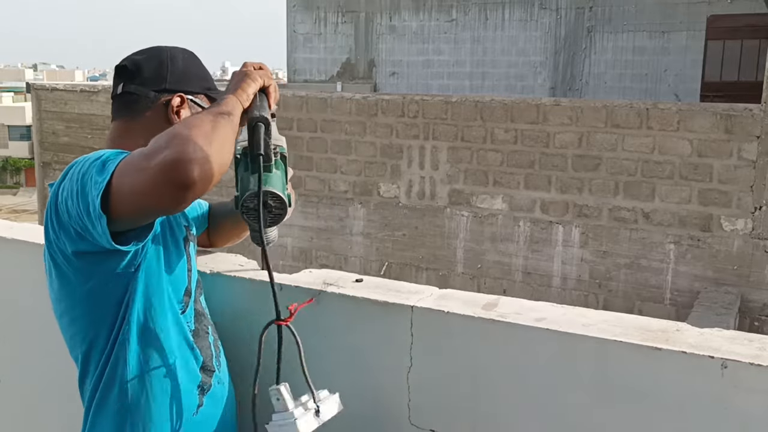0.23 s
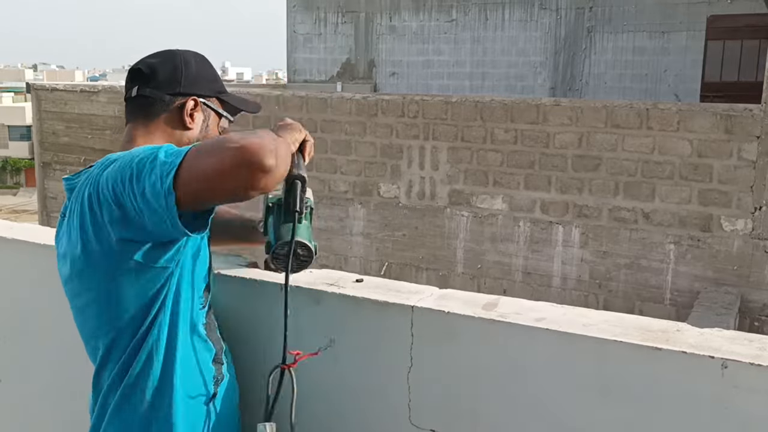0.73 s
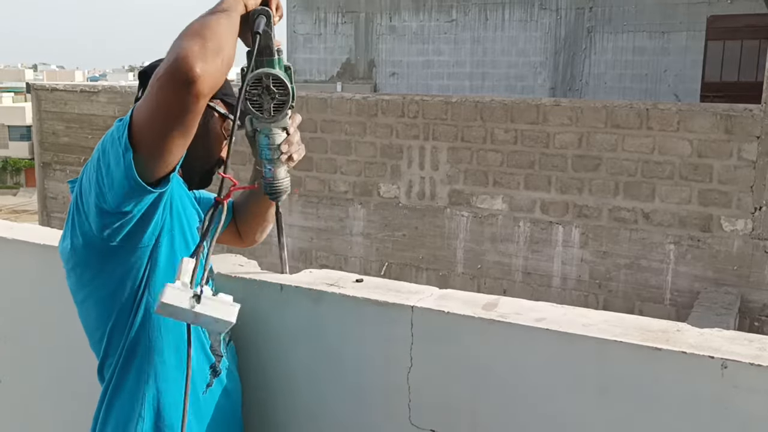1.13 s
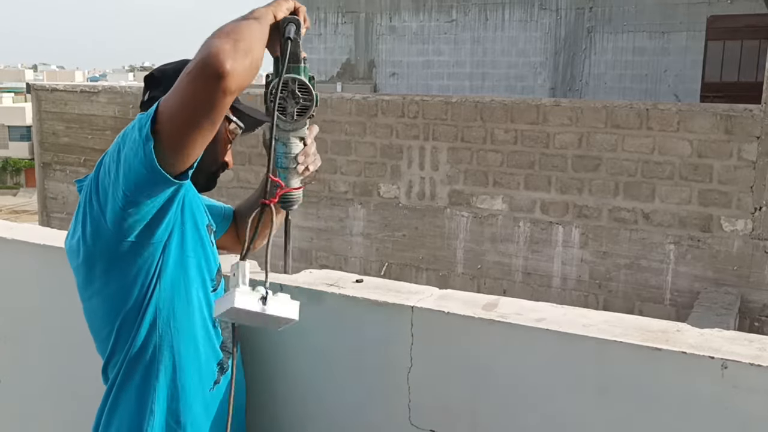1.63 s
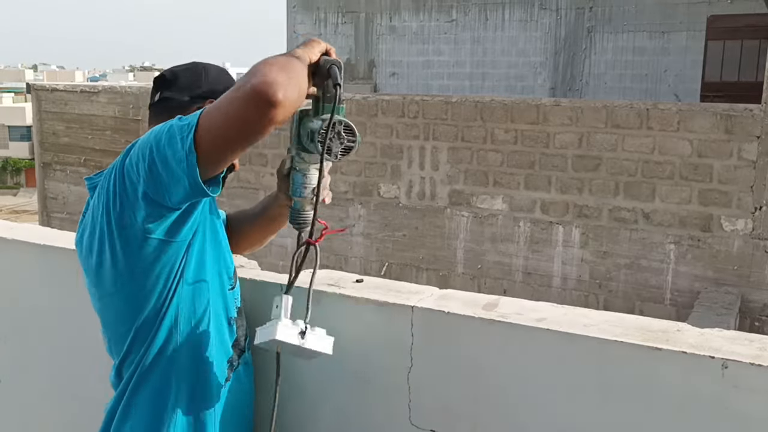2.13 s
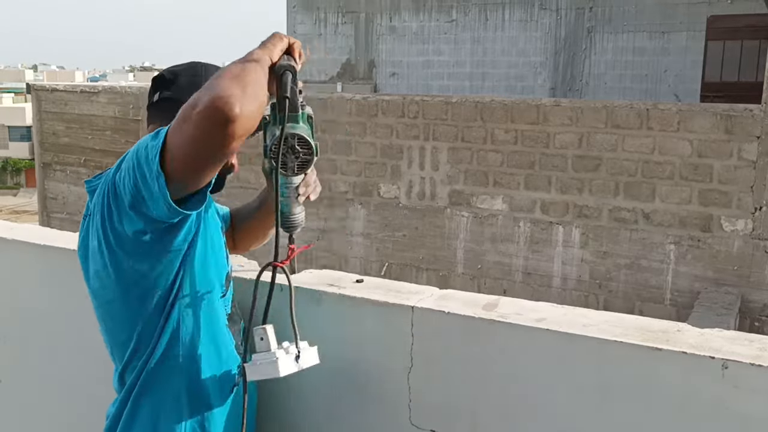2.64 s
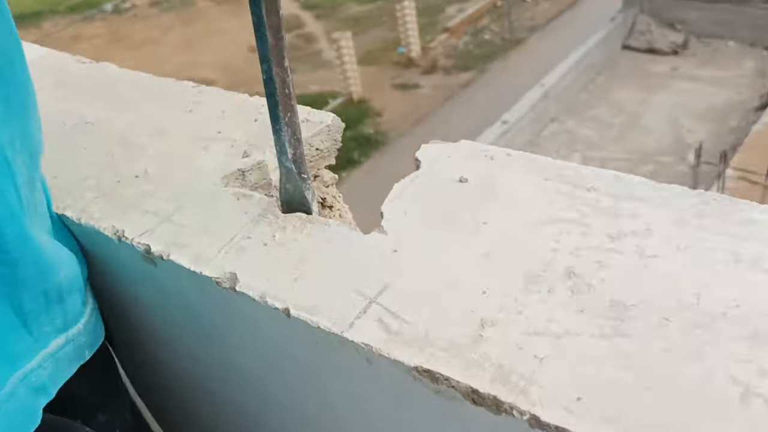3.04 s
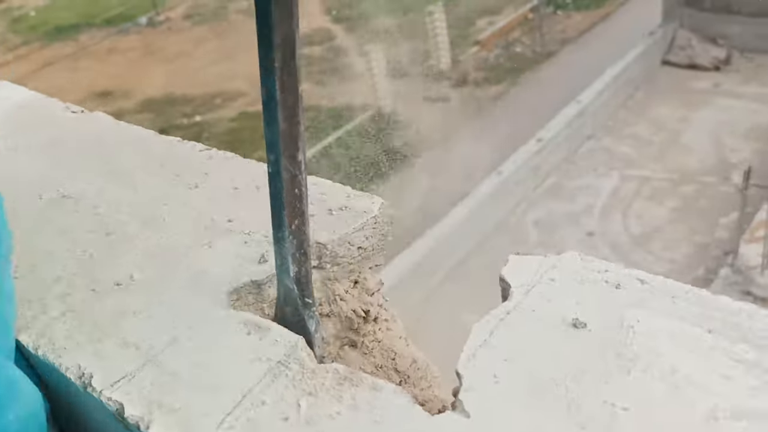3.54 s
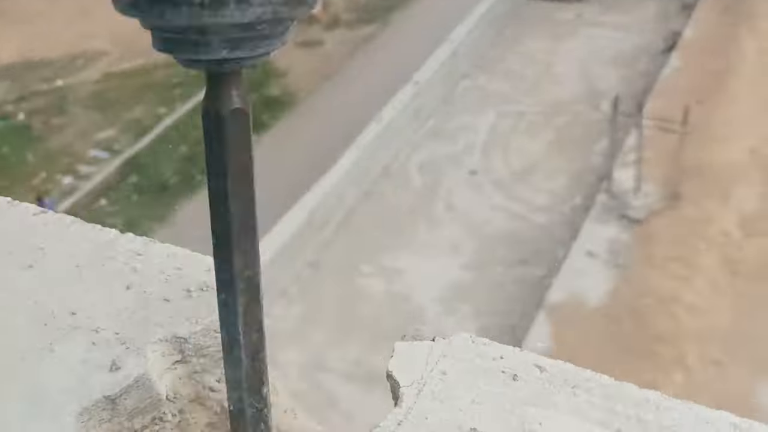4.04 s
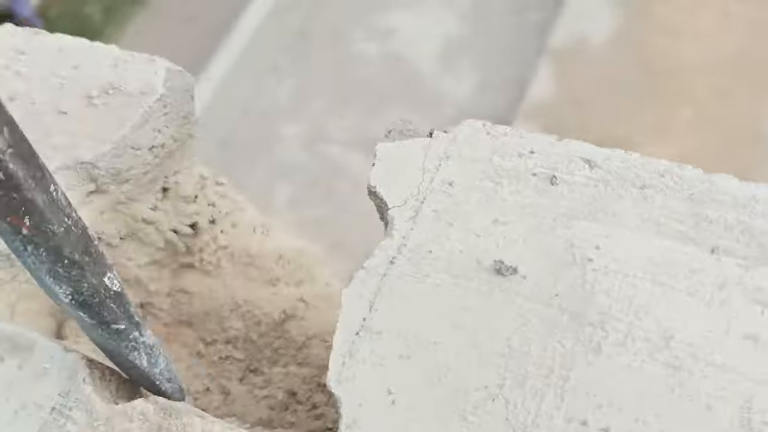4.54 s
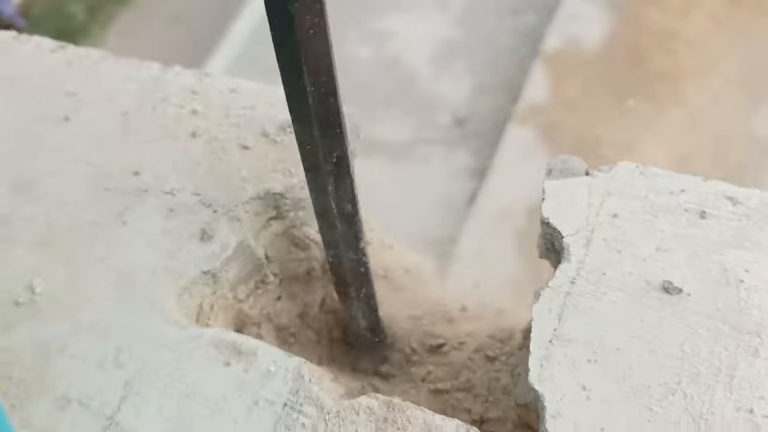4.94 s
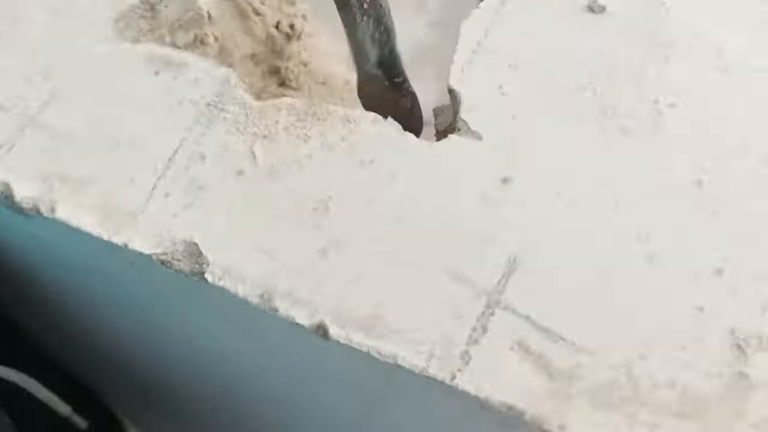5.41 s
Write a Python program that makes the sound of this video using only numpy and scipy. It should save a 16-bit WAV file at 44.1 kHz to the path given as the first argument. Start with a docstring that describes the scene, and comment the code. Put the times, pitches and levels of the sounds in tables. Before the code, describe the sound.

Brief hammering bursts from a power chisel crunch into concrete on an open rooftop, with whirring gears between, then a brighter close view and a skidding scrape.

```python
"""An electric hammer drill chisels a concrete parapet on an open roof, in short bursts.
First it is heard from a few steps away: gears and brushes hiss and chatter at the motor's changing speed,
each burst of striker blows rings steel and crunches concrete, and the tool sings as it coasts.
After a brief dip in level it is heard from beside the chisel, which jangles and rings as it leans;
air puffs hardest on the left, and near the end the chisel skids with a rising scrape and a knock."""
import sys
import numpy as np
from scipy import signal
from scipy.fft import rfft, irfft
from scipy.io import wavfile
from scipy.ndimage import uniform_filter1d

SR = 44100
rng = np.random.default_rng(int(sys.argv[2]) if len(sys.argv) > 2 else 0)


def output_pcm(signal):
    """Save a mono or channel-first signal as 16-bit PCM at the path in sys.argv[1].

    Samples are clipped to [-1, 1] before scaling.
    """
    pcm = np.clip(np.atleast_2d(signal).T, -1, 1) * 32767
    wavfile.write(sys.argv[1], SR, np.round(pcm).astype(np.int16))


N = 250047
T = np.arange(N) / SR
HZ = np.fft.rfftfreq(N, 1 / SR)


def amp(db):
    """Decibels to linear gain."""
    return 10 ** (np.asarray(db) / 20)


def unit(x):
    """Scales a sound to rms 1."""
    return x / np.sqrt(np.mean(x ** 2) + 1e-20)


def curve(rows, axis=1):
    """One column of a table, joined by straight lines in time."""
    rows = np.asarray(rows)
    return np.interp(T, rows[:, 0], rows[:, axis])


def across(points):
    """A table joined by straight lines on a log-frequency axis."""
    hz, value = np.transpose(points)
    return np.interp(np.log(HZ + 1), np.log(hz + 1), value)


def wander(hz):
    """Slow chance of rms 1, up to about hz changes a second."""
    spectrum = rfft(rng.standard_normal(N)) * np.exp(-(HZ / hz) ** 2)
    return unit(irfft(spectrum, N))


def colour(x, points, bumps=()):
    """Causal (minimum-phase) filter: a broad colour with resonances on top."""
    db = across(points)
    for hz, width, gain_db in bumps:
        db = db + gain_db / (1 + (2 * (HZ - hz) / width) ** 2)
    cepstrum = irfft(np.log(amp(np.maximum(db, -100))), N)
    causal = 2 * cepstrum * (np.arange(N) < N // 2)
    return irfft(rfft(x) * np.exp(rfft(causal)), N)


def resonate(x, hz, width):
    """A resonance of gain 1 that follows the curve hz."""
    turn = np.exp(2j * np.pi * np.cumsum(hz) / SR)
    r = np.exp(-np.pi * width / SR)
    # shift the centre to 0 Hz, smooth there, and shift back
    return 2 * (turn * signal.lfilter([1 - r], [1, -r], x / turn)).real


def ports(pair, like, lean, lead_ms):
    """Blends two unrelated versions of a sound into left and right, with a mid of rms 1."""
    left, other = rfft(pair)
    same = np.clip(across(like), 0, 1)
    tilt = amp(across(lean) / 2)
    right = same * left + np.sqrt(1 - same ** 2) * other
    right = right * np.exp(-2j * np.pi * HZ * lead_ms / 1000)  # the left leads
    out = irfft(np.array([left * tilt, right / tilt]), N)
    return out / np.sqrt(np.mean(out.mean(0) ** 2))


def shimmer(pair, patchy_db, wide, long):
    """Uneven texture: regions of wide bins by long frames swell and fade on their own."""
    z = signal.stft(pair, nperseg=512, noverlap=384)[2]
    patches = rng.standard_normal(z.shape[1:])
    patches = uniform_filter1d(patches, wide, axis=0)
    patches = unit(uniform_filter1d(patches, long, axis=1))
    return signal.istft(z * amp(patchy_db * patches), nperseg=512, noverlap=384)[1][:, :N]


def swell(start, length, attack_s, release_s):
    """Rises over attack_s, holds until length is over, then dies away."""
    rise = np.clip((T - start) / attack_s, 0, 1)
    return rise * np.exp(-np.maximum(T - start - length, 0) / release_s)


def swells(rows, attack_s, release_s):
    """The gain of a series of events (start [s], length [s], level [dB]); the strongest wins."""
    return np.max([amp(db) * swell(start, length, attack_s, release_s) for start, length, db in rows], axis=0)


# bursts of hammering: (start [s], length [s], force [dB],
#                       speed the motor climbs towards [knocks/s], air puff level [dB])
BURSTS = [(0.1, 0.07, -25.5, 100.1, -47), (0.145, 0.11, -21.5, 111.9, -50), (0.3, 0.059, -21, 133.6, -53),
          (0.38, 0.066, -19, 127.1, -56), (0.482, 0.052, -20.5, 133.7, -52),
          (0.556, 0.1, -20.5, 122.3, -62), (0.663, 0.049, -24, 87.4, -53), (1.347, 0.11, -25, 104, -41),
          (1.46, 0.057, -24, 113.9, -49), (1.521, 0.06, -38, 105.2, -60), (2.239, 0.225, -22, 119.4, -47),
          (2.46, 0.056, -27, 121, -52), (2.602, 0.13, -56, 108.4, -67), (2.857, 0.07, -26.5, 123.6, -37),
          (3.362, 0.09, -24.5, 121.6, -35), (3.629, 0.085, -24, 120.5, -34.5),
          (3.853, 0.073, -27, 143.2, -30), (4.072, 0.055, -25, 153.1, -31.5),
          (4.294, 0.076, -24, 158.5, -32), (4.497, 0.038, -23, 156.7, -32),
          (4.681, 0.049, -25.5, 165, -35.5), (4.873, 0.17, -22.5, 159.1, -36.5),
          (5.247, 0.064, -21, 115.1, -32.5), (5.318, 0.06, -24, 122.9, -48), (5.588, 0.07, -24, 121.7, -36)]
# the motor spins up just before each burst, runs on a little, then coasts down towards idling
IDLE_HZ, LEAD_S, SPIN_UP_S, RUN_ON_S, COAST_S = 68.05, 0.035, 0.05, 0.055, 0.17


def motor_speed():
    """Knock cycles a second: the motor climbs towards each burst's speed and coasts in between."""
    speed = np.full(N, float(IDLE_HZ))
    for start, length, _, top_hz, _ in BURSTS:
        on, off = start - LEAD_S, start + length + RUN_ON_S
        t, before = T[T >= on], np.interp(on, T, speed)
        driven = top_hz + (before - top_hz) * np.exp(-(np.minimum(t, off) - on) / SPIN_UP_S)
        coast = np.exp(-np.maximum(t - off, 0) / COAST_S)
        speed[T >= on] = IDLE_HZ + (driven - IDLE_HZ) * coast
    return speed


def rotation(speed, waver=0.035):
    """Count of knock cycles so far; the speed is never quite steady."""
    return np.cumsum(speed * (1 + waver * wander(30))) / SR


def with_speed(speed, db, db_per_octave):
    """A gain that is db at 100 knocks a second and grows with the speed."""
    return amp(db + db_per_octave * np.log2(speed / 100))


def force(attack_s, release_s):
    """Strength of the striker's blows through the bursts."""
    return swells([row[:3] for row in BURSTS], attack_s, release_s)


def chatter(turns, depth, decay, uneven, grain_db, per_s):
    """Tiny metal contacts that crowd after each knock; every other knock is stronger."""
    after_knock = 1 + depth * np.exp(-(turns % 1) / decay)  # decay in knock cycles
    gate = after_knock * (1 + uneven * np.cos(np.pi * turns))
    size = amp(grain_db * np.minimum(rng.exponential(1, N), 4))
    size = size * (rng.random(N) < per_s / SR)
    burst = np.sqrt(signal.lfilter([1], [1, -np.exp(-1 / (SR * 0.0006))], size ** 2))
    return unit(gate * burst * rng.standard_normal((2, N)))


def breeze(db=-69):
    """A faint rumble of open air: noise weighted to the lows."""
    low_colour = [(20, -6), (100, 3), (200, -10), (3000, -62)]
    return amp(db) * unit(colour(rng.standard_normal((2, N)), low_colour))


# colour of moving air: (frequency [Hz], relative level [dB])
PUFF_COLOUR = [(25, -18), (70, -31), (100, -9), (135, -7.5), (230, -1), (350, -0.5), (600, -10),
               (1500, -38), (4000, -59)]
# stray puffs of air between bursts: (start [s], length [s], level [dB])
STRAY_PUFFS = [(-0.02, 0.066, -33), (1.769, 0.076, -42), (1.963, 0.035, -40.5), (2.119, 0.035, -54),
               (2.59, 0.045, -47), (2.705, 0.027, -42), (3.786, 0.02, -46)]


def air(turns, lumps_db=2, pulsed=0.15, draught_db=-61):
    """Lumpy puffs of air that throb with the piston, mostly on the left, over the draught of the fan."""
    lumps = unit(colour(rng.standard_normal((2, N)), PUFF_COLOUR))
    strokes = np.sin(2 * np.pi * turns) + amp(-3) * np.sin(4 * np.pi * turns)
    throb = unit(colour(strokes, PUFF_COLOUR)) * np.array([[1], [0]])
    puffs = np.sqrt(1 - pulsed) * lumps + np.sqrt(pulsed) * throb
    puffs = puffs * amp(lumps_db * wander(79))
    pair = ports(puffs, [(50, 0.59), (500, 0.95)], [(50, 8.4), (150, 35.4), (500, 19.8)], lead_ms=0)
    gusts = [(start, length, db) for start, length, _, _, db in BURSTS] + STRAY_PUFFS
    return pair * (swells(gusts, attack_s=0.0086, release_s=0.011) + amp(draught_db))


# notes that the tool sings while it coasts: (start [s], length [s], level [dB], first pitch [Hz])
NOTES = [(0.01, 0.09, -43, 922), (1.0, 0.12, -45, 935), (1.17, 0.16, -42, 918), (1.91, 0.15, -47, 928),
         (2.12, 0.084, -44, 928)]
NOTE_SAG_HZ_PER_S = 75


def coasting_notes(waver=0.0069, flutter_db=2):
    """Sine notes that sag in pitch, with an unsteady pitch and level."""
    out, drift, flutter = np.zeros(N), wander(60.2), wander(30)
    for start, length, db, first_hz in NOTES:
        hz = (first_hz - NOTE_SAG_HZ_PER_S * (T - start)) * (1 + waver * drift)
        level = amp(db + flutter_db * flutter) * swell(start, length, attack_s=0.02, release_s=0.017)
        out += level * unit(np.sin(2 * np.pi * np.cumsum(hz) / SR))
    return out


# thin whistles: (start [s], end [s], first pitch [Hz], pitch nearly reached at the end [Hz], peak [dB])
WHISTLES = [(0.92, 1.03, 15600, 14100, -49), (1.6, 1.7, 15600, 14400, -50), (2.165, 2.195, 8650, 8450, -30),
            (2.19, 2.24, 7450, 7750, -29), (3.14, 3.32, 15400, 12900, -48), (3.23, 3.33, 15700, 14600, -41),
            (3.94, 4.06, 12100, 13800, -41), (4.14, 4.28, 12600, 14000, -38),
            (4.36, 4.5, 12200, 13800, -35), (4.54, 4.68, 13000, 14250, -35),
            (4.73, 4.89, 13400, 14450, -37)]


def whistles(waver=0.006):
    """Thin quivering sines whose glide slows down as they swell and fade."""
    out, quiver = np.zeros(N), wander(300)
    for start, end, from_hz, to_hz, db in WHISTLES:
        span = (T > start) & (T < end)
        u = (T[span] - start) / (end - start)
        glide = from_hz + (to_hz - from_hz) * u * (1.3 - 0.33 * u)
        hz = glide * (1 + waver * quiver[span])
        arch = 2 * np.sqrt(u * (1 - u))
        out[span] += amp(db) * arch * np.sin(2 * np.pi * np.cumsum(hz) / SR)
    return out


# single knocks: (time [s], level [dB], centre [Hz], bandwidth as a standard deviation [octaves], t60 [s])
KNOCKS = [(0.911, -18.5, 900, 1.1, 0.04), (1.02, -35, 408, 0.45, 0.25), (5.3255, -6, 800, 0.95, 0.024)]


def knocks():
    """Dull single knocks as the chisel jumps and chips break away: fading bands of noise."""
    out, t = np.zeros((2, N)), T[:SR // 4]
    octave = np.log2(np.fft.rfftfreq(len(t), 1 / SR) + 1)
    for s, db, hz, width, t60 in KNOCKS:
        bell = np.exp(-((octave - np.log2(hz)) / width) ** 2 / 2)
        band = irfft(rfft(rng.standard_normal(len(t))) * bell, len(t))
        fade = amp(db - 60 * t / t60) * (1 - np.exp(-t / 0.0013))
        knock = unit(band * fade) * np.sqrt(np.mean(fade ** 2))
        part = out[:, round(s * SR):][:, :len(t)]
        part += knock[:part.shape[1]]
    return out


# the chisel skids out of the hole: (time [s], resonance [Hz], level [dB])
SKID = [(5.29, 2802, -29), (5.33, 3055, -16.5), (5.36, 3496, -20), (5.39, 4150, -13), (5.42, 5630, -34),
        (5.45, 5990, -60)]


def skid(width_hz=1100):
    """A rising scrape of steel on concrete: noise through a climbing resonance, twice."""
    scrape = rng.standard_normal((2, N))
    for _ in range(2):
        scrape = resonate(scrape, curve(SKID), width_hz)
    during = (T > SKID[0][0]) & (T < SKID[-1][0])
    return unit(scrape) * amp(curve(SKID, axis=2)) * during


# sprays of dust: (start [s], length [s], level [dB])
SPRAYS = [(1.81, 0.027, -31), (2.68, 0.061, -46), (2.87, 0.19, -29.5)]
# nearness of the chisel: (time [s], hiss level at 100 knocks/s [dB], added left minus right [dB])
NEARNESS = [(2.9, -20, 1), (3.25, -20, -1.5), (3.75, -19, -1.3), (4.2, -16, -2.5), (4.65, -16, -5),
            (4.97, -14.5, -4), (5.2, -16.5, -3.5), (5.39, -12.5, -0.5), (5.48, -16, -4),
            (5.67, -17.5, -2.5)]


def fizz(turns, speed, near, near_db=-15, crushed_db=-7.0):
    """Dust and brush sparks above the ring of the steel: afar they follow the speed, close by each burst."""
    sparks = chatter(turns, depth=0.36, decay=0.38, uneven=0.06, grain_db=4.0, per_s=9500)
    sparks = shimmer(sparks, patchy_db=3, wide=6, long=16)
    bright = unit(colour(sparks, [(3000, -66), (8000, -3), (9500, 4.5), (11000, 1.5), (12700, 6), (15800, -5)]))
    mellow = unit(colour(sparks, [(3000, -75), (8000, 2.5), (9800, 3.0), (12500, 1), (15800, -5.5)]))
    pair = ports((1 - near) * bright + near * mellow, [(9000, 0.3)], [(9000, -3.0)], lead_ms=0.133)
    afar = with_speed(speed, db=-37.5, db_per_octave=5)
    crushed = amp(crushed_db) * force(attack_s=0.021, release_s=0.042)
    close = np.hypot(amp(curve(NEARNESS) + near_db), crushed)
    sprays = swells(SPRAYS, attack_s=0.015, release_s=0.027)
    return pair * np.hypot((1 - near) * afar + near * close, sprays)


# broad colour of the far hiss: (frequency [Hz], relative level per Hz [dB])
HISS_FAR = [(60, -60), (110, -24.5), (330, -15), (600, -17.5), (1100, -17), (1500, -14), (2400, -12),
            (2900, -5), (3700, -8), (5500, -2.5), (7200, -1.5), (8100, -0.5), (10500, -22), (15800, -22.5)]
# resonances of the housing: (frequency [Hz], width [Hz], gain over the broad colour [dB])
HOUSING = [(1550, 67, 6), (1930, 240, 4.5), (2956, 72, 5), (3280, 280, 2), (3700, 300, 2.5), (4030, 70, 7),
           (4780, 650, 2), (6800, 450, 1.5), (8040, 980, -7.5)]
# the two microphone ports from afar, also for the hammering: (frequency [Hz], likeness [0-1])
LIKE_FAR = [(130, 1), (300, 0.95), (800, 0.83), (1400, 0.44), (3000, 0.047), (12000, 0)]
# and (frequency [Hz], left minus right [dB])
LEAN_FAR = [(200, 0), (700, 1.5), (1300, 1.5), (4400, 2.5), (15000, -3.5)]


def gears_far(turns, speed, flutter_db=0.6):
    """Gear and brush hiss through the resonances of the housing."""
    drive = chatter(turns, depth=0.4, decay=0.63, uneven=0.043, grain_db=1.5, per_s=16000)
    drive = shimmer(drive, patchy_db=1.5, wide=5, long=14)
    level = with_speed(speed, db=-25.5, db_per_octave=5.0) * amp(flutter_db * wander(9.9))
    return ports(colour(drive, HISS_FAR, HOUSING), LIKE_FAR, LEAN_FAR, lead_ms=0) * level


# broad colour of the near hiss: (frequency [Hz], relative level per Hz [dB])
HISS_NEAR = [(88, -53), (150, -23), (450, -20.5), (900, -21), (1300, -12.5), (2000, -9.5), (3000, -6),
             (4200, -2), (5500, -2.5), (7000, -2), (8200, -6.5), (9000, -7), (12000, -13.5), (15800, -41)]
# resonances of the chisel: (frequency [Hz], width [Hz], gain over the broad colour [dB])
CHISEL = [(2046, 410, 6.5), (3113, 400, 2), (3736, 284, -5), (4201, 250, -1), (4820, 460, 3),
          (7710, 340, 4.5)]
# centre of the chisel's brightest resonance: (time [s], frequency [Hz])
BRIGHTEST = [(2.9, 5300), (3.25, 5536), (3.5, 6408), (4.05, 6908), (4.45, 5702), (4.8, 6300), (5.0, 5477),
             (5.4, 5868), (5.67, 5855)]
# rings of the leaning chisel: (upright [Hz], leaning [Hz], width of each of two filter passes [Hz])
RINGS = [(5370, 5500, 1100), (7460, 8220, 590)]
# strength of the rings against the jangle: (time [s], lower ring [dB], upper ring [dB])
LEANING = [(2.8, -15, -5), (3.0, -7, -11), (3.25, -19, -7), (3.7, -6, -9), (4.1, -12, -7.5), (4.5, -9, -13),
           (4.88, -16, -10), (5.08, 1, -11), (5.36, -5, -40), (5.67, -7, -14)]
LEAN_FROM_S, LEAN_TO_S = 2.92, 4.15


def gears_near(turns, speed, flutter_db=0.24):
    """Close by, the chisel jangles in its holder and rings differently as the tool leans."""
    drive = chatter(turns, depth=0.25, decay=0.96, uneven=0.014, grain_db=2.0, per_s=6300)
    drive = shimmer(drive, patchy_db=1.52, wide=8, long=26)
    hiss = colour(drive, HISS_NEAR, CHISEL)
    hiss = unit(hiss + amp(1) * resonate(hiss, curve(BRIGHTEST), 1900))
    power = 1
    for k, (upright_hz, leaning_hz, width) in enumerate(RINGS):
        ring = chatter(turns, depth=0.96, decay=0.44, uneven=0.05, grain_db=5.0, per_s=16000)
        centre = np.interp(T, [LEAN_FROM_S, LEAN_TO_S], [upright_hz, leaning_hz])
        for _ in range(2):
            ring = resonate(ring, centre, width)
        strength = amp(curve(LEANING, axis=k + 1))
        hiss = hiss + strength * unit(ring)
        power = power + strength ** 2
    hiss = hiss / np.sqrt(power)  # the rings change the tone, hardly the level
    like = [(300, 0.67), (1500, 0.31), (3000, 0.46), (6000, 0.15), (12000, 0.067)]
    lean = [(500, -3.0), (2000, 6.5), (4000, 2.0), (7000, -1.5), (14000, 0.5)]
    pair = ports(hiss, like, lean, lead_ms=0.14)
    swing = amp(curve(NEARNESS, axis=2) * np.array([[0.5], [-0.5]]))
    level = with_speed(speed, curve(NEARNESS), db_per_octave=0.5) * amp(flutter_db * wander(25))
    return pair * swing / swing.mean(0) * level


def blows(turns, rough, jitter, spread_db, ring_s):
    """One blow of the striker a cycle, a short scattered ring, and the crunch of concrete after each."""
    at = np.diff(np.floor(turns + jitter * wander(200)), prepend=0) > 0
    hits = at * amp(spread_db * rng.standard_normal(N))
    t = T[:SR // 20]
    ring = rng.standard_normal((2, len(t))) * amp(-60 * t / ring_s)
    spectrum = rfft(ring)
    ring = irfft(spectrum / abs(spectrum), len(t))  # scatters each blow in time and leaves its colour alone
    steel = unit(signal.oaconvolve(hits[None], ring, axes=1)[:, :N])
    crunch = chatter(turns, depth=0.41, decay=0.098, uneven=0.08, grain_db=1.5, per_s=2500)
    return np.sqrt(1 - rough) * steel + np.sqrt(rough) * crunch


# broad colour of the far blows: (frequency [Hz], relative level per Hz [dB])
STRIKE_FAR = [(80, -31), (170, -23.5), (320, -1.5), (600, -4.5), (850, -5), (1150, -4), (1600, -2),
              (2000, -7), (2500, -6), (3800, -4), (5500, -36), (9000, -35), (15000, -23)]
# resonances of the struck steel: (frequency [Hz], width [Hz], gain over the broad colour [dB])
STRUCK = [(416, 67, 4.5), (504, 21, 6), (565, 27, 7.5), (640, 44, 9.5), (777, 18, 10), (857, 52, 10.5),
          (980, 130, 1), (1176, 80, 9.5), (1250, 42, 12.5), (1410, 50, 8), (1707, 51, 3), (1956, 80, 9.5)]


def hammer_far(turns, idle_db=-45):
    """The hammering through the body of the tool and the wall; with the tool raised it loses body."""
    drive = blows(turns, rough=0.4, jitter=0.02, spread_db=-0.5, ring_s=0.039)
    drive = colour(drive, STRIKE_FAR, STRUCK)
    raised = np.interp(T, [0.8, 1.3], [0, 1])
    thin_colour = [(200, -2.5), (420, -6.5), (850, 0), (1200, -3.0), (1900, 1.5), (3000, -3.5)]
    thin = irfft(rfft(drive) * amp(across(thin_colour)), N)
    pair = ports((1 - raised) * drive + raised * thin, LIKE_FAR, LEAN_FAR, lead_ms=0)
    return pair * np.hypot(force(attack_s=0.034, release_s=0.046), amp(idle_db))


# broad colour of the near blows: (frequency [Hz], relative level per Hz [dB])
STRIKE_NEAR = [(100, -21), (250, -7), (600, -2), (1300, -2.5), (2200, -0.5), (3400, 0.5), (5000, 1),
               (8000, -19), (15000, -27)]
# the two microphone ports beside the chisel: (frequency [Hz], likeness [0-1])
LIKE_NEAR = [(300, 0.27), (1400, 0.53), (4000, 0.25)]
# and (frequency [Hz], left minus right [dB])
LEAN_NEAR = [(300, 6.6), (700, 8.5), (2400, 1.8), (8000, 1)]


def hammer_near(turns, speed):
    """At the tip the blows are brighter and mostly crunch; between bursts the striker rattles loosely."""
    drive = blows(turns, rough=0.69, jitter=0.02, spread_db=-0.5, ring_s=0.0087)
    pair = ports(colour(drive, STRIKE_NEAR), LIKE_NEAR, LEAN_NEAR, lead_ms=0.13)
    idling = with_speed(speed, db=-43.0, db_per_octave=21)
    return pair * np.hypot(force(attack_s=0.018, release_s=0.027), idling)


# the near view begins with a dip in level that recovers over DIP_S
MOVE_S, DIP_DB, DIP_S = 2.766, -19, 0.1


def scene():
    """The far view gives way to the near one, with a brief dip in level."""
    speed = motor_speed()
    turns = rotation(speed)
    near = np.clip((T - MOVE_S) / 0.002, 0, 1)
    dip = amp(DIP_DB * near * np.clip(1 - (T - MOVE_S) / DIP_S, 0, 1))
    far_sound = gears_far(turns, speed) + hammer_far(turns)
    near_sound = gears_near(turns, speed) + hammer_near(turns, speed) + skid()
    drill = (1 - near) * far_sound + near * near_sound
    drill = drill + fizz(turns, speed, near) + coasting_notes() + whistles() + knocks()
    return dip * (drill + air(turns) + breeze())


EDGE_HZ = 15850  # upper band limit


def record(dry):
    """The highest peaks are rounded off at full scale; then the band limit."""
    rounded = dry / (1 + dry ** 6) ** (1 / 6)
    lowpass = signal.firwin(611, EDGE_HZ, window=("kaiser", 8), fs=SR)
    return signal.oaconvolve(rounded, lowpass[None], "same")


dry = scene()
out = record(dry)
output_pcm(out)
```